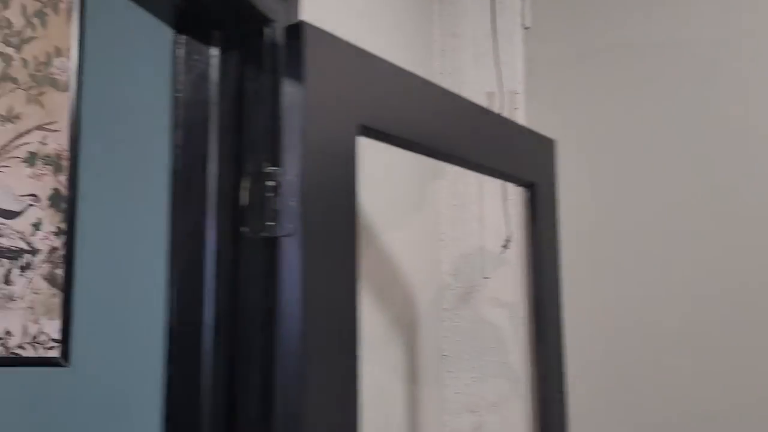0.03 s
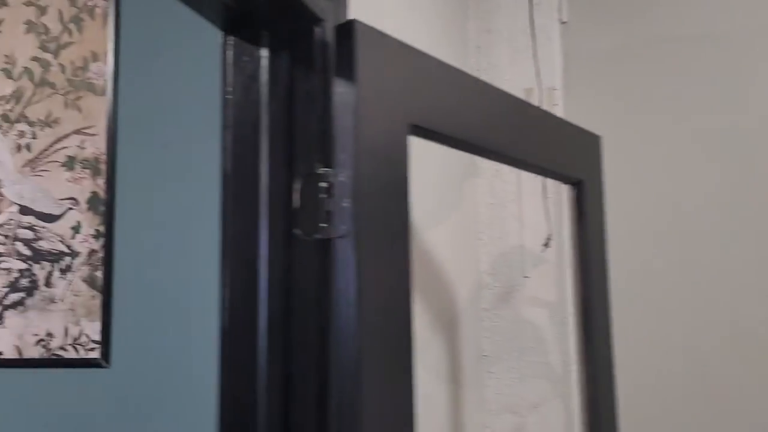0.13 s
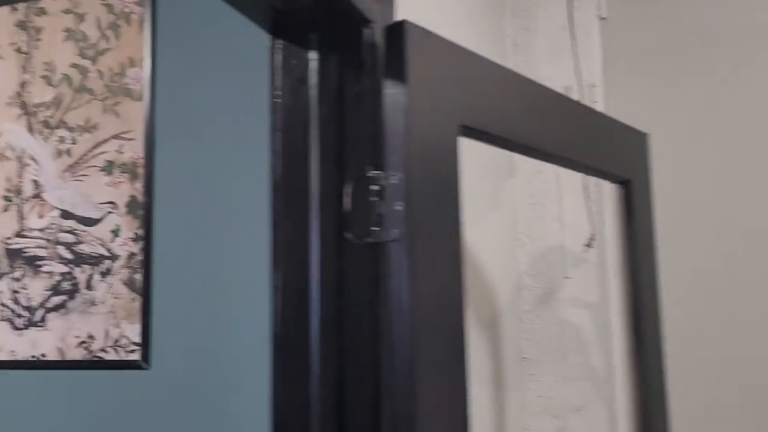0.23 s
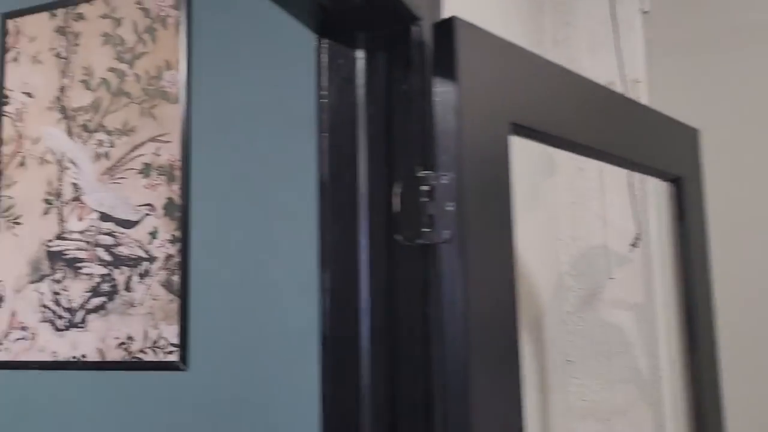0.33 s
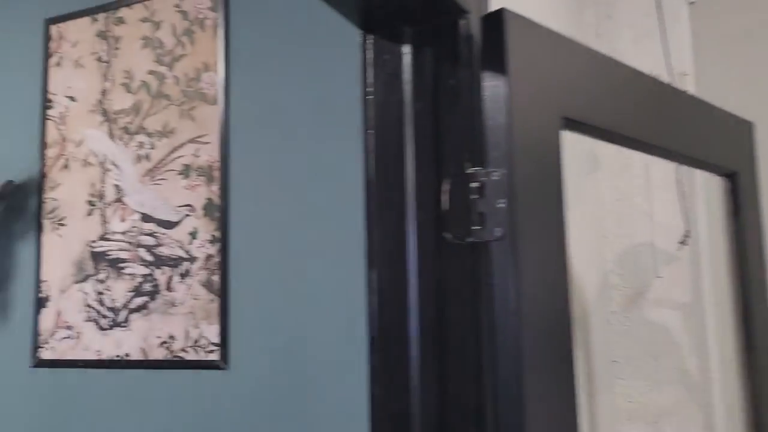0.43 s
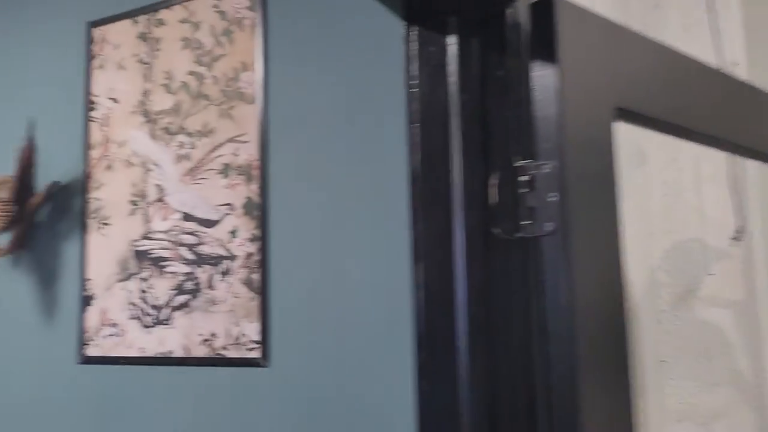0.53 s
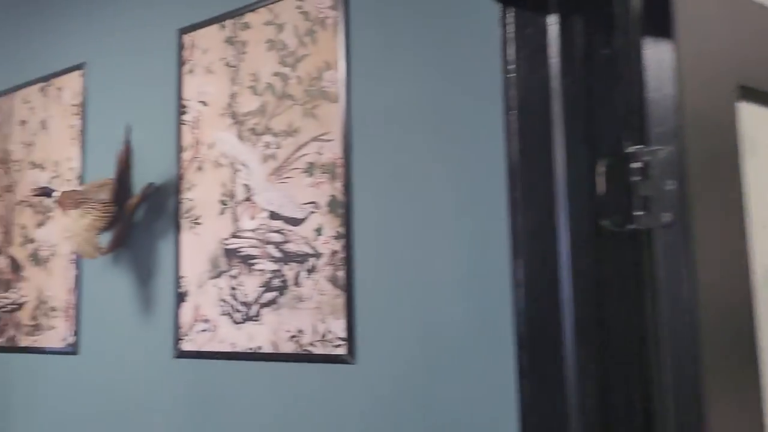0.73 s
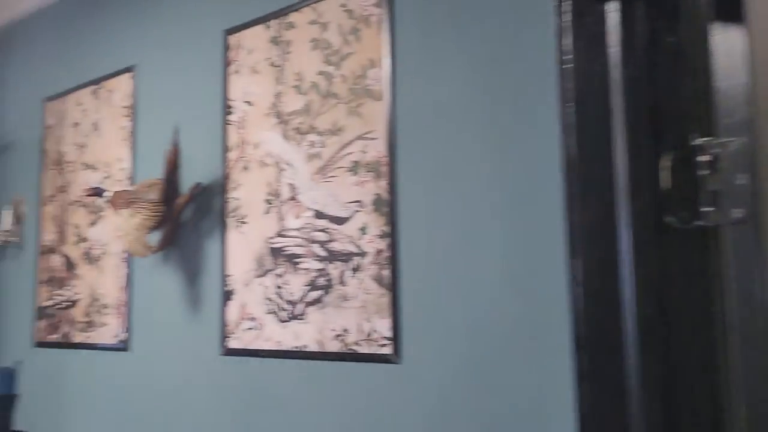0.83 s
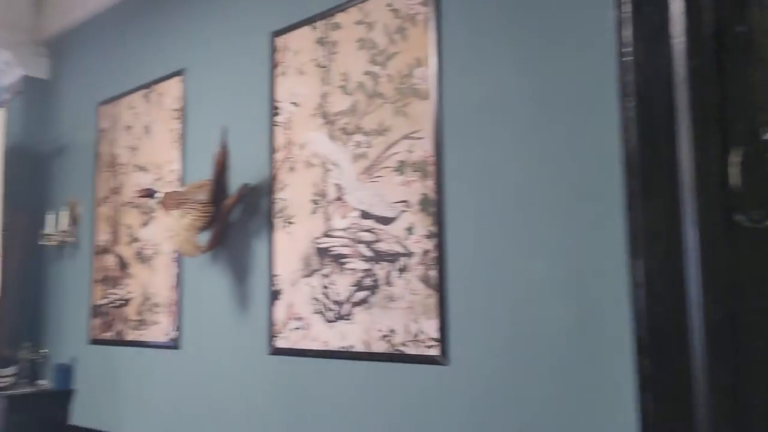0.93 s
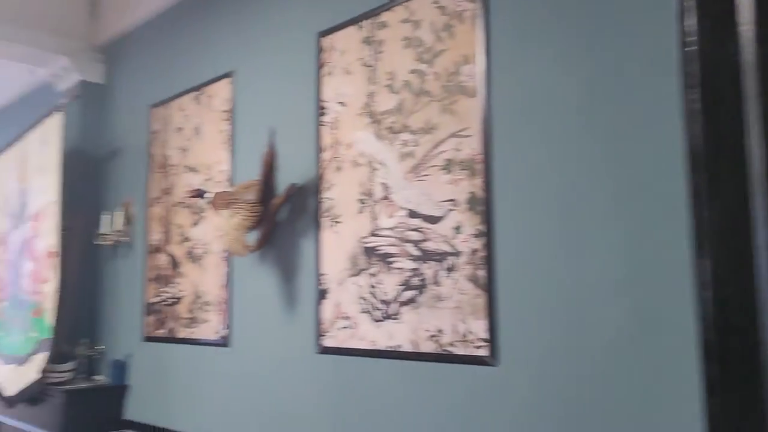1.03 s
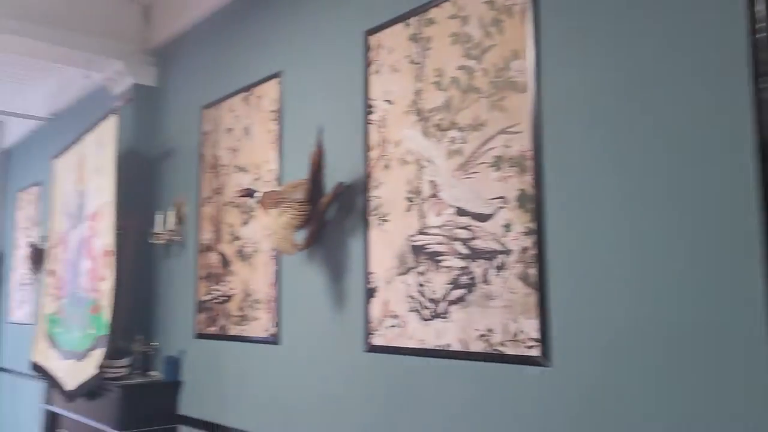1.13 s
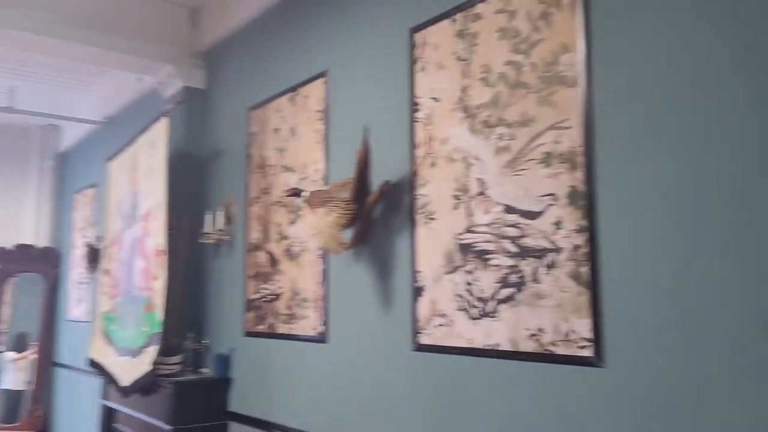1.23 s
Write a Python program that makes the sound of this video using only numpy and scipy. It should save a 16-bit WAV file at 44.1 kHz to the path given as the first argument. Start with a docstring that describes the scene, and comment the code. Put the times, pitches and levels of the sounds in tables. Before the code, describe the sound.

Two hard metallic clacks from a door latch echo through a room. The first is a quick clatter; then the mechanism ticks and snaps home with a longer ring and a hollow door knock. Faint ventilation rumbles underneath.

```python
"""A steel door latch clacks twice, hard, in a bare echoing room.
Each clack is a sharp crack plus the ring of the metal, drawn out by the room.
The mechanism ticks softly just before the second clack; the door leaf knocks just after it.
Under it: ventilation noise, hum, rumble and soft thumps. A limiter flattens each clack's onset."""
import sys
import numpy as np
from scipy import signal
from scipy.fft import rfft, irfft
from scipy.io import wavfile
from scipy.ndimage import uniform_filter1d, map_coordinates

SR = 44100
rng = np.random.default_rng(int(sys.argv[2]) if len(sys.argv) > 2 else 0)


def digitize_waveform(pressure):
    """Quantize a signal to 16-bit integers and store it at the path in sys.argv[1].

    Rows of a 2-D input are taken as channels; values are limited to [-1, 1].
    """
    field = np.atleast_2d(pressure).T
    bounded = np.clip(field, -1, 1)
    quanta = np.round(bounded * 32767).astype(np.int16)
    wavfile.write(sys.argv[1], SR, quanta)


N = 57330

# latch contacts, first clack: t/s, relative level/dB
FIRST_CONTACTS = [(.232, -12.5), (.2365, -14.5), (.2398, -10), (.2745, -8.5), (.472, -26)]


def amp(db):
    """Decibels to gain."""
    return 10 ** (np.asarray(db) / 20)


def unit(x):
    """Scale to rms 1."""
    return x / np.sqrt(np.mean(abs(x) ** 2) + 1e-20)


def along(points, hz):
    """(f/Hz, value) points interpolated on a log axis."""
    f, values = np.transpose(points)
    return np.interp(np.log(hz + 1), np.log(f + 1), values)


def grid_hz():
    """Bins of a transform twice the scene's length."""
    return np.fft.rfftfreq(2 * N, 1 / SR)


def filtered(x, response):
    """x through a response given on the grid."""
    return irfft(rfft(x, 2 * N) * response)[..., :N]


def causal(gain_db):
    """Minimum-phase response with the given gain."""
    cepstrum = irfft(np.log(np.maximum(amp(gain_db), 1e-6)))
    cepstrum[1:N] *= 2
    cepstrum[N + 1:] = 0
    return np.exp(rfft(cepstrum))


def diffuse():
    """White stereo noise, alike in the bass, unrelated in the treble."""
    # f/Hz, left-right correlation
    coherence = [(60, 0.83), (280, 0.86), (640, 0.34), (1300, 0), (15000, .02)]
    angle = np.arccos(np.clip(along(coherence, grid_hz()), -1, 1)) / 2
    mid, side = filtered(rng.standard_normal((2, N)), np.array([np.cos(angle), np.sin(angle)]))
    return np.array([mid + side, mid - side])


def noise(colour):
    """Coloured diffuse noise, rms 1."""
    return unit(filtered(diffuse(), amp(along(colour, grid_hz()))))


def ventilation(air_db=-55, hum_hz=118, hum_db=-67.5):
    """Steady air noise and hum under a low rumble of varying level."""
    # spectra: f/Hz, relative level/dB
    air_colour = [(25, -21), (59, -11), (88, -27.5), (120, -39), (180, -11), (250, -3.5), (400, -10.5),
                  (750, -9.5), (1000, -15), (1600, -8.5), (3200, -16), (4200, -26), (7000, -26),
                  (9000, -41), (13000, -33), (15500, -45.5)]
    rumble_colour = [(25, -25.5), (55, 0.5), (90, -12), (125, 1), (180, -8.5), (260, -5.5), (400, -7.5),
                     (900, -11), (3000, -56.5)]
    # t/s, level/dB
    rumble_envelope = [(0, -53.5), (.25, -62), (.32, -54), (.6, -55), (.85, -50), (1.0, -52.5), (1.15, -54),
                       (1.3, -70)]
    t = np.arange(N) / SR
    hum = amp(hum_db) * np.sqrt(2) * np.sin(2 * np.pi * (hum_hz * t + rng.random()))
    rumble = amp(np.interp(t, *np.transpose(rumble_envelope))) * noise(rumble_colour)
    return amp(air_db) * noise(air_colour) + hum + rumble


def faint_echo(level_db=-53, t60_s=0.42):
    """A faint echo dies away at the start."""
    # f/Hz, relative level/dB
    colour = [(100, -15), (600, 3), (3000, 0), (4200, -9), (7000, -14), (9000, -22.5), (13000, -24),
              (16000, -42)]
    t = np.arange(N) / SR
    return amp(level_db - 60 * t / t60_s) * noise(colour)


def chink(level_db=-9.5, t60_s=0.013):
    """A bright steel-on-steel scrape, heard directly, opens the first clack."""
    # f/Hz, relative level/dB
    colour = [(1000, -39.5), (2200, -5.5), (7000, -20), (9000, -26), (11000, 11), (13000, 11),
              (15500, -17.5)]
    t = np.arange(N) / SR - FIRST_CONTACTS[0][0]
    return (t >= 0) * amp(level_db - 60 * np.maximum(t, 0) / t60_s) * noise(colour)


def crack(colour, resonances=()):
    """Response of a hard contact: broad spectrum, lifted at any metal resonances; energy 1."""
    f = grid_hz()
    lift_db = sum(db * np.exp(-4 * np.log(2) * ((f - hz) / width_hz) ** 2)
                  for hz, width_hz, db in resonances)
    return unit(causal(along(colour, f) + lift_db))


def room(direct_db=-39):
    """Impulse response: weak centred direct sound; dense tail, bass blooms late, treble dies first."""
    # f/Hz, t60/s
    reverb_times = [(100, 0.77), (500, 0.9), (1300, 0.99), (2500, 0.69), (4000, 0.66), (7000, 0.57),
                    (10000, 0.44), (15000, 0.26)]
    # f/Hz, time constant/s
    build_times = [(100, 0.017), (600, 0.012), (1300, 0.0068), (2500, 0.00518), (6000, 0.0038)]
    hz, t, spectra = signal.stft(diffuse(), SR, nperseg=256)
    decay = amp(-60 * t / along(reverb_times, hz)[:, None])
    bloom = 1 - np.exp(-(t + 0.0031) / along(build_times, hz)[:, None])
    response = signal.istft(spectra * decay * bloom, SR, nperseg=256)[1][:, :N]
    response /= np.sqrt(np.sum(response ** 2) / 2)
    response[:, 0] += amp(direct_db)
    return response


def strikes(contacts, response):
    """Each contact excites the response and sets off the room anew."""
    out = np.zeros((2, N))
    for start_s, db in contacts:
        start = round(start_s * SR)
        out[:, start:] += amp(db) * room()[:, :N - start]
    return filtered(out, response)


def after_ring(start_s, modes, t60_s, swell_s, waver_rad):
    """Modes swell and die, wavering as the room feeds them back; energy 1."""
    t = np.maximum(np.arange(N) / SR - start_s, 0)
    out = np.zeros((2, N))
    for hz, db in modes:
        for side in range(2):
            knots = rng.standard_normal((2, 64))
            drift, flutter = [map_coordinates(row, [t * 22]) for row in knots]  # 22 knots/s
            phase = 2 * np.pi * (hz * t + rng.random()) + waver_rad * drift
            out[side] += amp(db + 2 * flutter - 60 * t / t60_s) * np.sin(phase)
    out *= 1 - np.exp(-t / swell_s)
    return out / np.sqrt(np.sum(out ** 2) / 2)


def first_clack():
    """The latch catches in a quick clatter; the steel rings on."""
    # crack spectrum, steel modes: f/Hz, relative level/dB
    colour = [(60, -33), (130, -24.5), (190, -28), (280, -14.5), (370, -24), (620, -14.5), (1000, -15.5),
              (1460, -11.5), (1750, -6), (2200, -1.5), (3200, -1.5), (3900, -1), (5500, -1), (7400, 0.5),
              (8600, -8.5), (11500, -4), (13000, -8), (14000, -14.5), (15500, -18)]
    modes = [(2210, -19), (2920, -12), (3296, 2.5), (5210, 0), (5835, -4)]
    # f/Hz, width/Hz, lift/dB
    resonances = [(2170, 190, 4.5), (2480, 60, 2.0), (2940, 100, 5.5), (3080, 110, 4.5), (3310, 150, 8.5),
                  (4040, 80, 4.0), (4280, 210, 3.5), (5200, 100, 4.0), (5420, 210, 6.5), (5820, 210, 4.5),
                  (6060, 210, 3.0), (6400, 210, 5.0), (6620, 80, 3.0), (7370, 210, 5.5)]
    clatter = strikes(FIRST_CONTACTS, crack(colour, resonances))
    ring = after_ring(FIRST_CONTACTS[2][0], modes, t60_s=0.62, swell_s=0.0045, waver_rad=0.2)
    return amp(29.5) * clatter + amp(10.5) * ring


def thumps(rise_s=0.0062, t60_s=0.11):
    """Soft thumps in the room, each one low mode that swells and dies quickly."""
    # t/s, f/Hz, level/dB
    events = [(0.273, 134, -37), (0.318, 120, -37.5), (.425, 62, -42), (0.579, 118, -41), (.85, 65.6, -39),
              (.955, 123, -48), (1.047, 252.5, -35.5)]
    out = np.zeros(N)
    for start_s, hz, db in events:
        t = np.maximum(np.arange(N) / SR - start_s, 0)
        envelope = amp(db - 60 * t / t60_s) * (1 - np.exp(-t / rise_s))
        out += envelope * np.sin(2 * np.pi * (hz * t + rng.random()))
    return out


def ticks(room_db=15, t60_s=0.012):
    """Small, fairly dry ticks as the mechanism takes up its slack."""
    # t/s, level/dB
    contacts = [(0.8108, -30.5), (0.814, -53), (0.82, -39.5), (0.83, -41)]
    # f/Hz, relative level/dB
    colour = [(60, -31), (250, -2), (700, 3.5), (2200, 4), (4000, -5), (7000, -7), (12000, -19.5),
              (15500, -23.5)]
    t = np.arange(N) / SR
    envelope = sum(amp(db - 60 * np.maximum(t - start_s, 0) / t60_s) * (t >= start_s)
                   for start_s, db in contacts)
    return envelope * noise(colour) + amp(room_db) * strikes(contacts, crack(colour))


def second_clack():
    """The latch snaps home and rings longer."""
    # t/s, relative level/dB
    contacts = [(.8495, -5.5), (.852, -4)]
    # crack spectrum, steel modes: f/Hz, relative level/dB
    colour = [(60, -34), (130, -38.5), (270, -15.5), (400, -21.5), (630, -13.5), (1100, -15), (1500, -12),
              (1750, -6), (2200, 0), (3200, -1), (3900, 0.5), (5500, 1), (7400, 2), (8700, -4), (11500, -1),
              (13100, -5), (13800, -16), (14600, -8), (15500, -25)]
    modes = [(2940, -7), (3490, 0), (4010, -7), (5070, -9), (6378, -2), (6965, -8), (7556, -5)]
    # f/Hz, width/Hz, lift/dB
    resonances = [(1940, 70, 4.5), (2220, 80, 7.5), (2690, 110, 10.0), (3060, 200, 11.5), (3260, 130, 10.5),
                  (3460, 100, 15.0), (3840, 100, 9.5), (4170, 80, 6.0), (4500, 150, 4.5), (5090, 210, 8.5),
                  (5560, 190, 11.5), (6120, 140, 10.0), (6390, 120, 14.0), (6680, 200, 5.5),
                  (6960, 90, 12.5), (7260, 150, 11.0), (7550, 150, 14.0), (8160, 150, 10.0),
                  (9340, 80, 3.5), (10750, 130, 4.0), (11720, 380, 9.5), (12470, 340, 11.0),
                  (13110, 380, 11.5)]
    snap = strikes(contacts, crack(colour, resonances))
    ring = after_ring(contacts[0][0], modes, t60_s=1.05, swell_s=0.0064, waver_rad=0.61)
    return amp(27.5) * snap + amp(7.5) * ring


def leaf_knock(start_s=0.876):
    """The door leaf hits its frame with a short hollow knock."""
    # f/Hz, relative level/dB
    modes = [(625, 1), (690, -7), (835, -2), (1010, -6), (1225, 3), (1420, -2)]
    return amp(3) * after_ring(start_s, modes, t60_s=0.22, swell_s=0.014, waver_rad=1.1)


def scene():
    """Latch and door leaf over the room's background."""
    door = chink() + first_clack() + second_clack() + leaf_knock() + ticks()
    return door + thumps() + ventilation() + faint_echo()


def limiter(x, limit_db=-9.5, window_s=0.0013, release_db_per_s=118):
    """Gain drops at once above the limit and recovers at a steady rate."""
    power = abs(uniform_filter1d(np.mean(x ** 2, axis=0), round(window_s * SR)))
    over_db = np.maximum(10 * np.log10(power + 1e-12) - limit_db, 0)
    release_db = release_db_per_s * np.arange(N) / SR
    return x * amp(release_db - np.maximum.accumulate(over_db + release_db))


def record(dry):
    """Colour of the two microphone ports, limiter, full-scale clipping, band limit."""
    # f/Hz, left minus right/dB
    port_balance = [(80, 1.5), (400, -0.5), (1300, -2.5), (2200, 4.5), (3250, 9.5), (3500, 9), (3800, 0.5),
                    (4500, -5), (5500, 1), (6500, -1.5), (7400, -4), (9000, -2), (10500, 4), (13000, 2)]
    lean_db = along(port_balance, grid_hz()) / 2
    ports = np.array([causal(lean_db), causal(-lean_db)])
    limited = limiter(filtered(dry, ports))
    return filtered(np.clip(limited, -1, 1), grid_hz() < 15750)


dry = scene()
out = record(dry)
digitize_waveform(out)
```